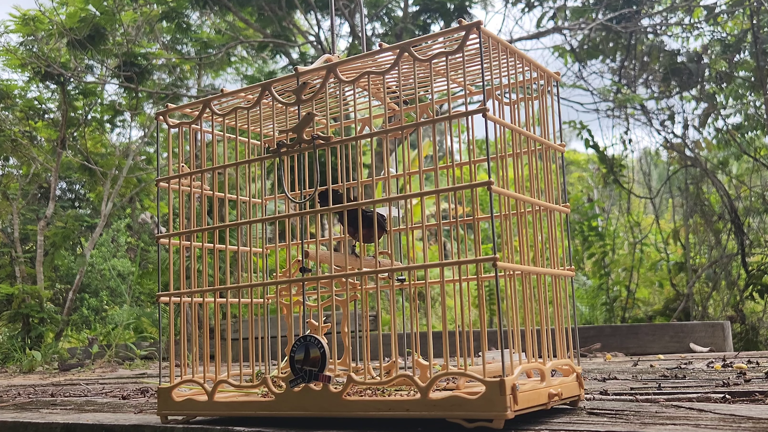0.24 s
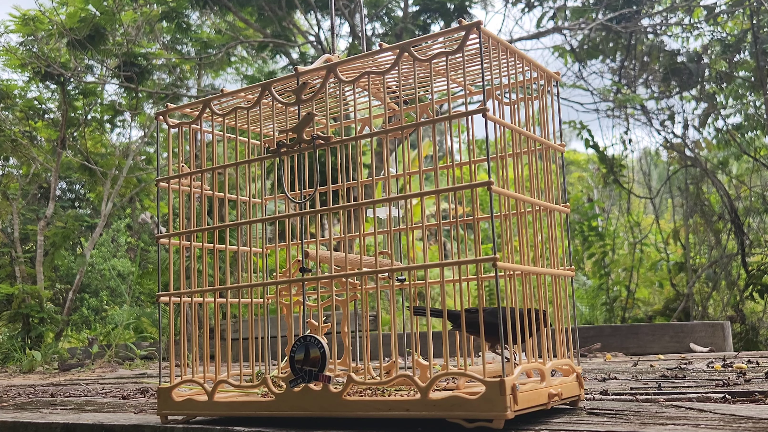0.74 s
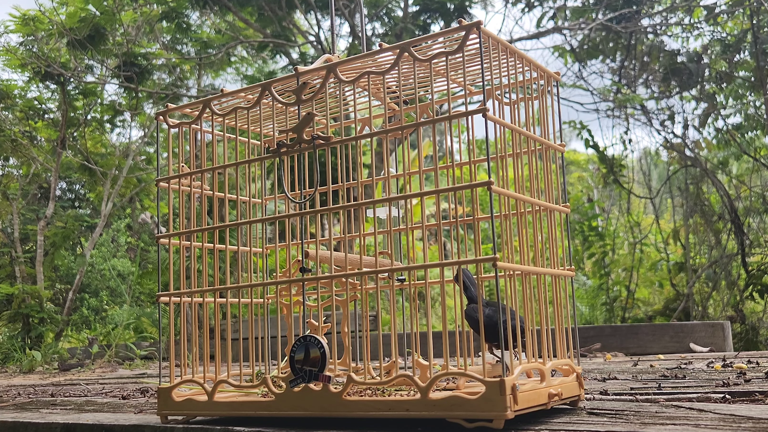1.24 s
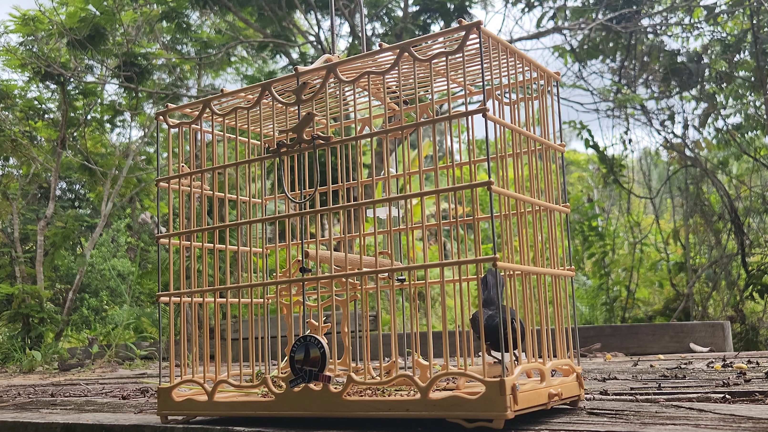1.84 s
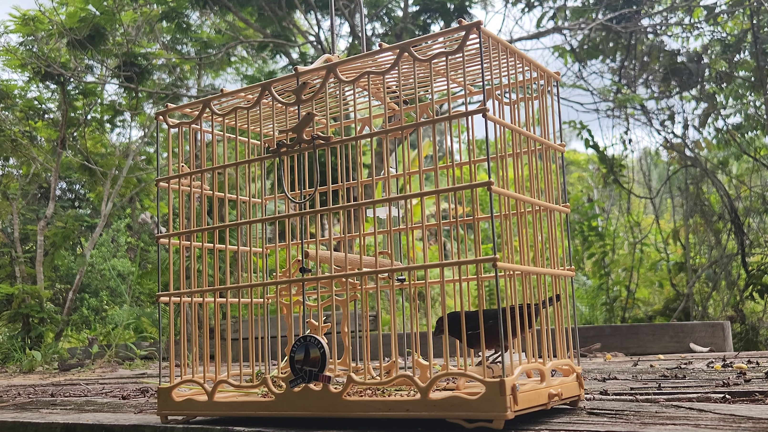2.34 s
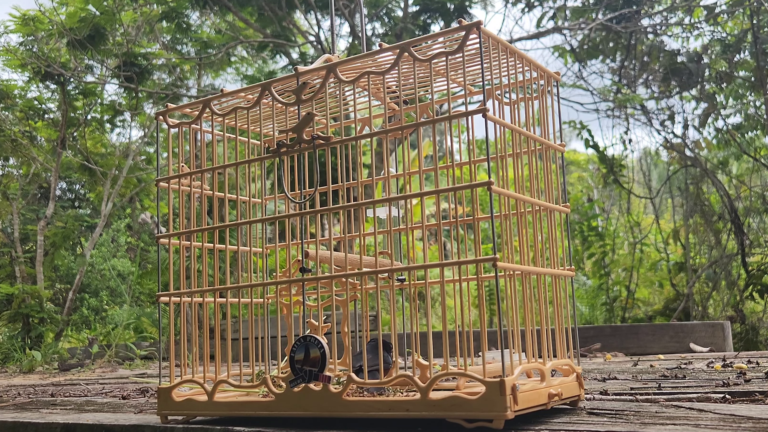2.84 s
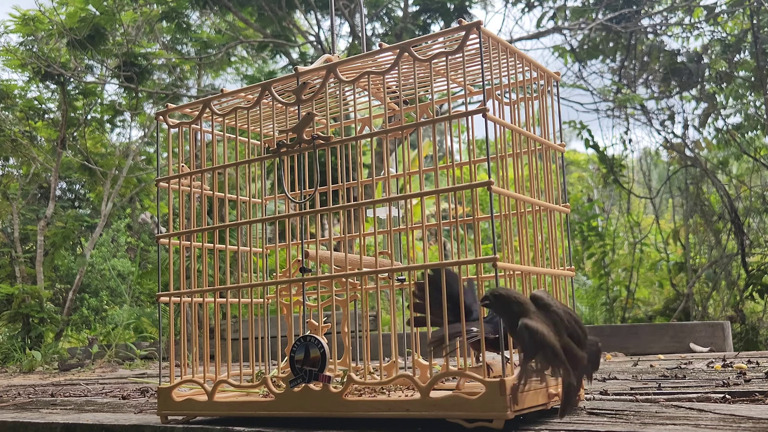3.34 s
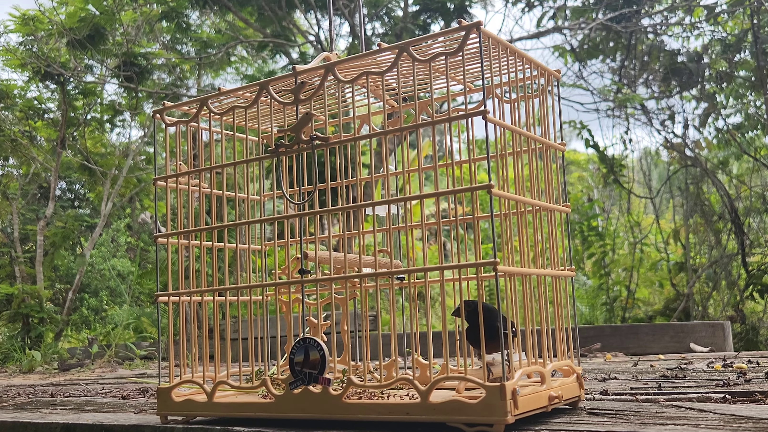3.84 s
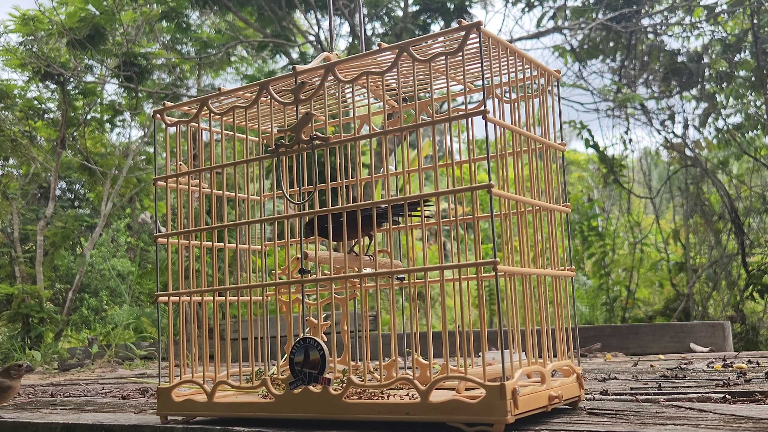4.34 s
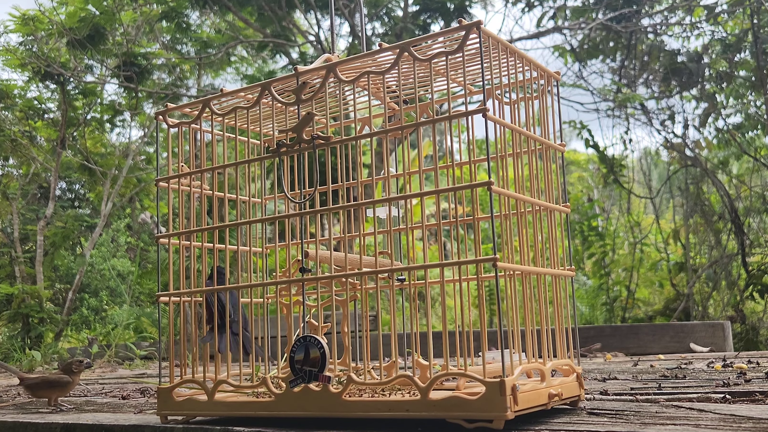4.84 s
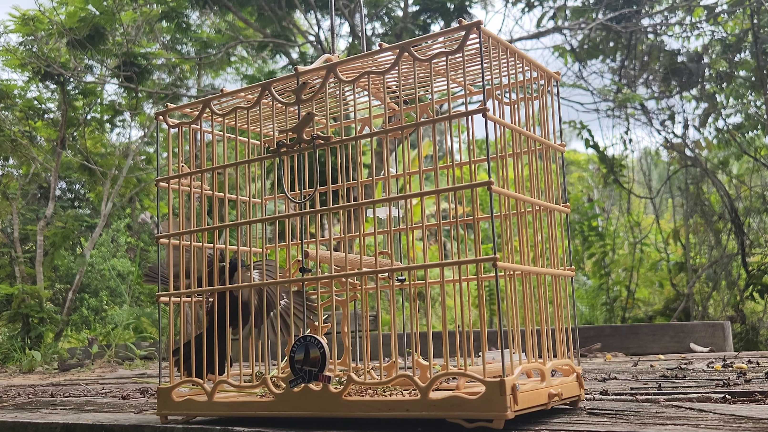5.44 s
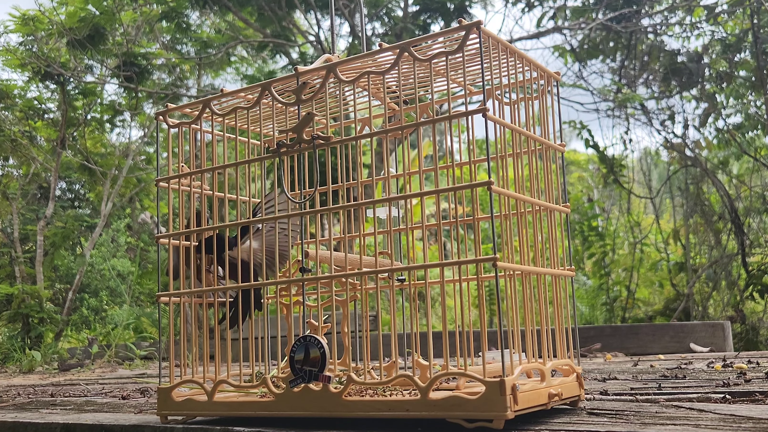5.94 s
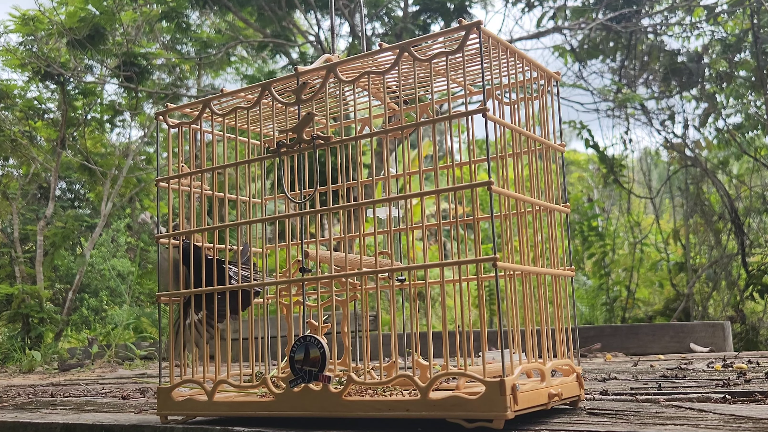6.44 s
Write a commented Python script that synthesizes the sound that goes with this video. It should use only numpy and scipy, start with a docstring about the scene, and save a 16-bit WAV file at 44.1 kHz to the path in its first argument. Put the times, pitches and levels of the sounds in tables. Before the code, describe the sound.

Quiet woodland with insects and distant peeps, then wings whoosh close past, claws tick on cage bars, and slurred whistles lead into a buzzy trill.

```python
"""Far whistles and faint peeps come from the trees over insects, while a finch stirs in a small barred cage
on a wooden deck at the edge of a wood. A second finch then flies close past the microphone and lands.
Slurred whistles, a buzz and a trill follow, as feathers brush and flutter on the bars and claws tick on them.
Birds sing as gliding tones; wings are pulses of air with swishing noise; feathers are grainy noise bursts;
claws are noise snaps with ringing modes; insects are narrow bands of noise in soft outdoor air."""
import sys
import numpy as np
from scipy import signal
from scipy.fft import rfft, irfft
from scipy.io import wavfile
from scipy.ndimage import uniform_filter1d

SR = 44100
rng = np.random.default_rng(int(sys.argv[2]) if len(sys.argv) > 2 else 0)


def generate_wav(sig):
    """Save sig (samples, or channels by samples) to the path in sys.argv[1] as 16-bit PCM at SR."""
    pcm = np.round(np.clip(np.atleast_2d(sig).T, -1, 1) * 32767).astype(np.int16)
    wavfile.write(sys.argv[1], SR, pcm)


N = 295470
TIME, FREQS = np.arange(N) / SR, np.fft.rfftfreq(N, 1 / SR)

# claws catching the bars: start_s, peak_db, knock_db (low ring, relative), scuff_db (sliding foot)
CLAW_CATCHES = [(2.072, -53.5, -3, -64), (3.097, -51, -30, -81), (3.127, -48, -30, -85),
                (3.39, -36, 1, -53.5), (3.776, -39, -6, -57.5), (4.542, -35, -16, -70),
                (4.633, -38, -30, -61.5), (4.844, -46, 6, -67), (5.479, -42, -14, -70),
                (5.505, -46, -27, -51.5), (5.993, -45.5, -15, -66), (6.028, -46.5, -38, -60),
                (6.194, -38, -8, -49.5), (6.36, -37, -2.5, -57), (6.465, -37, -5, -55),
                (6.574, -38.5, 1, -52.5), (6.644, -48.5, 3, -54)]
# bright colour of feathers and claws on the bars: frequency_hz, gain_db
BRIGHT_COLOUR = [(600, -22), (2000, -14), (4000, -8), (5500, 3), (8000, -1), (12000, -2.5), (16000, -7)]
# how alike left and right are for sounds near the microphones: frequency_hz, likeness (0-1)
NEAR_LIKENESS = [(40, 0.91), (500, 0.8), (1200, 0.57), (2500, 0), (16000, 0)]


def amp(db):
    """Decibels to gain."""
    return 10 ** (np.asarray(db) / 20)


def unit(x):
    """Scales to rms 1."""
    return x / np.sqrt(np.mean(x ** 2) + 1e-20)


def read(points):
    """A spectrum joined by straight lines over log frequency."""
    hz, value = np.transpose(points)
    return np.interp(np.log(FREQS + 1), np.log(hz), value)


def add(mix, start_s, sound):
    """Mixes a sound in at its start time, cut off at the end of the scene."""
    part = mix[..., max(round(start_s * SR), 0):][..., :sound.shape[-1]]
    part += sound[..., :part.shape[-1]]


def placed(pan_db):
    """Left and right gains for a level difference; positive is louder on the left."""
    return amp([[pan_db / 2], [-pan_db / 2]])


def drift(rate_hz):
    """Random motion of rms 1, smoothed by a Gaussian low-pass."""
    return unit(irfft(rfft(rng.standard_normal(N)) * np.exp(-(FREQS / rate_hz) ** 2), N))


def noise(gain, likeness, grain_db=0):
    """Coloured stereo noise of rms 1; grain_db breaks it into tiny crackles."""
    grains = amp(grain_db * np.clip(drift(1970), -2.5, 2.5))
    left, other = rfft(rng.standard_normal((2, N)) * grains)
    same = np.clip(read(likeness), -1, 1)
    right = same * left + np.sqrt(1 - same ** 2) * other
    return unit(irfft(np.array([left, right]) * gain, N))


def echoes(x, t60, delay):
    """Sparse scattered reflections, different on each side; t60 and delay in seconds."""
    t = np.arange(SR) / SR
    sparse = rng.standard_normal((2, SR)) * (rng.random((2, SR)) < .05)
    taps = sparse * amp(-60 * t / t60) * (t > delay)
    return signal.fftconvolve(np.atleast_2d(x), unit(taps) / np.sqrt(SR), axes=1)[:, :N]


def wingbeats(count=2):
    """Every beat as (s, push dB, swish dB): each burst swells to its strongest beat and dies away."""
    # bursts of wingbeats, in flight or fluttering on the bars:
    # strongest_beat_s, spread_s, push_db (air), swish_db (feathers)
    bursts = [(2.995, 0.035, -41, -59), (3.229, 0.031, -40.5, -56), (3.412, 0.048, -37, -39),
              (3.51, 0.034, -29.5, -38.5), (3.712, 0.071, -29.5, -35.5), (3.94, 0.029, -46.5, -43.5),
              (4.618, 0.031, -52, -69), (5.618, 0.1, -47, -49)]
    beat_gap_s, jitter_s = 0.03135, .0008
    push_fall_db, swish_fall_db = 6.5, 20  # drop one spread away from the strongest beat
    tiring_db = 2.5  # later beats are weaker
    beats = []
    for s, spread, push_db, swish_db in bursts:
        for offset in np.arange(-count, count + 1) * beat_gap_s:
            u = offset / spread
            beat_s = s + offset + jitter_s * rng.standard_normal()
            beat_push_db = push_db - push_fall_db * u ** 2 - tiring_db * u
            beat_swish_db = swish_db - swish_fall_db * u ** 2 - tiring_db * u
            beats.append((beat_s, beat_push_db, beat_swish_db))
    return beats


def wings(gust_db=-2, rebound=0.97, lead_s=0.0041, swish_s=0.0053, wake_db=-19, wake_s=0.033):
    """Each beat sucks the air in and throws it back; the feathers swish just before the deepest suction."""
    # colour of the swishing feathers: frequency_hz, gain_db
    swish_colour = [(25, 10), (130, 10), (300, -0.5), (750, 0), (1400, -7), (2800, -15.5), (7000, -19),
                    (16000, -25.5)]
    quiver_hz, quiver_db, quiver_s = 84.6, -7, 0.013  # the air quivers around each stroke
    push, power = np.zeros(N), np.zeros(N)
    t = np.arange(-.07, .07, 1 / SR)
    for s, push_db, swish_db in wingbeats():
        u = t / (0.0076 * rng.uniform(0.95, 1.2))  # half a stroke, in seconds, varies from beat to beat
        gust = (2 * u ** 2 - 1 + rebound * (u ** 3 - u)) * np.exp(-u ** 2)
        quiver = np.sin(2 * np.pi * (quiver_hz * t + rng.random())) * np.exp(-(t / quiver_s) ** 2)
        add(push, s + t[0], amp(push_db) * (amp(gust_db) * gust + amp(quiver_db) * quiver))
        wake = amp(wake_db) * np.exp(-(t / wake_s) ** 2)
        stroke = np.exp(-((t + lead_s) / swish_s) ** 2) + wake
        add(power, s + t[0], (amp(swish_db) * stroke) ** 2)
    swish = np.sqrt(power) * noise(amp(read(swish_colour)), NEAR_LIKENESS, grain_db=5.5)
    return push * placed(0.99) + swish


def flutter(count=7, gap_s=.05, slowing_s=.002):
    """Seconds from the start of the flutter to each blow on the bars; the gaps slowly widen."""
    k = np.arange(count)
    return k * gap_s + k * (k - 1) / 2 * slowing_s


def strokes():
    """Every touch on the cage as (s, body dB, hiss dB, fade): sweeps, scuffing feet and fluttering wings."""
    # single sweeps of feathers over the cage: start_s, body_db, hiss_db, fade (relative length)
    sweeps = [(.083, -64, -70, 0.013), (.608, -55.5, -61, 0.012), (1.39, -72.5, -65, 0.024),
              (2.471, -56, -65, .009), (2.609, -68, -41, 0.027), (2.972, -57, -55, 0.02),
              (3.055, -85, -59, .05), (3.094, -86, -48.5, 0.037), (3.226, -66, -53.5, .12),
              (3.323, -47.5, -50.5, 0.021), (3.407, -51.5, -52, 0.021), (3.637, -63.5, -63, 0.14),
              (4.539, -52.5, -50, 0.037), (4.618, -71, -57, 0.054), (4.816, -56.5, -49.5, 0.038),
              (4.928, -66, -58.5, 0.038), (5.479, -50.5, -45, 0.017), (5.994, -61, -52.5, 0.01),
              (6.518, -59.5, -64, 0.084)]
    # the foot slides 0.013 s before the claw catches
    scuffs = [(s - 0.013, db, db - 6, 0.016) for s, _, _, db in CLAW_CATCHES]
    blows = []
    for t in flutter():
        fall_db = 24 * t  # the flutter weakens by 24 dB a second
        blows.append((5.495 + t, -46 - fall_db, -49.5 - fall_db, 0.019))
    return [*sweeps, *scuffs, *blows]


def brushes(rise_share=0.2, tail_db=-27, tail_s=0.1, fizz_db=-13, lightness=0.077):
    """Feathers scrape over the bars in grainy bursts, dull body and bright hiss; light strokes fizz on top."""
    # dull colour of feathers on the cage: frequency_hz, gain_db
    body_colour = [(30, -5), (150, -13.5), (400, 1.5), (900, -2.5), (1600, -0.5), (2600, -1.5), (4500, -5),
                   (9000, -35)]
    # colour of the fizz: frequency_hz, gain_db
    fizz_colour = [(5000, -32), (8000, 7), (11000, 13), (16000, -15)]
    body, hiss, fizz = np.zeros(N), np.zeros(N), np.zeros(N)  # powers, so that strokes overlap as noise does
    t = np.arange(SR // 2) / SR
    for s, body_db, hiss_db, fade in strokes():
        rise = rise_share * fade
        fall = np.exp(-(t / (1.48 * fade)) ** 2) + amp(tail_db) * np.exp(-t / tail_s)
        shape = np.minimum(t / rise, 1) * fall
        stroke_fizz_db = hiss_db + fizz_db + lightness * (hiss_db - body_db)
        add(body, s - rise / 3, (amp(body_db) * shape) ** 2)
        add(hiss, s - rise / 3, (amp(hiss_db) * shape) ** 2)
        add(fizz, s - rise / 3, (amp(stroke_fizz_db) * shape) ** 2)
    dull = np.sqrt(body) * noise(amp(read(body_colour)), NEAR_LIKENESS, grain_db=3.0)
    bright = np.sqrt(hiss) * noise(amp(read(BRIGHT_COLOUR)), NEAR_LIKENESS, grain_db=5.0)
    fizzing = np.sqrt(fizz) * noise(amp(read(fizz_colour)), NEAR_LIKENESS, grain_db=9.0)
    return dull + (bright + fizzing) * placed(-1.1)


def ticks(snap_s=0.0022, snap_db=2, knock_db=-3, pan_db=0.5):
    """A claw snaps against a bar and the light frame rings briefly."""
    # colour of the snap: frequency_hz, gain_db
    snap_colour = [(300, -12), (2500, -5), (4500, 1), (8000, 0.5), (12000, 2), (16000, -6)]
    # ringing modes of the cage: centre_hz (each catch detunes it), level_db (relative), t60_s
    cage_modes = [(604, -14.5, 0.045), (925, 2, 0.013), (1376, 8.5, 0.008), (1810, -18, 0.0076),
                  (2260, -3, 0.021), (3350, -32, .012)]
    out, t = np.zeros((2, N)), np.arange(3000) / SR
    snap = noise(amp(read(snap_colour)), NEAR_LIKENESS)
    for s, db, low_db, _ in CLAW_CATCHES:
        ring = np.zeros(len(t))
        for hz, mode_db, t60 in cage_modes:
            ring += amp(mode_db - 60 * t / t60) * np.sin(2 * np.pi * hz * rng.uniform(0.91, 1.11) * t)
        crack = snap[:, rng.integers(N - len(t)):][:, :len(t)] * np.exp(-t / snap_s)
        catch = amp(snap_db) * crack + amp(knock_db + low_db) * ring / 2
        add(out, s, amp(db) * placed(pan_db) * catch)
    return out + amp(-20) * echoes(out, t60=0.014, delay=.002)


def scratches(per_s=12, size_db=-72):
    """Tiny claw scratches as the bird shifts its grip, stronger once it grows restless."""
    loudness_db = size_db + 2.5 * np.minimum(rng.exponential(1, N), 3)
    sizes = amp(loudness_db) * (rng.random(N) < per_s / SR)
    shape = signal.lfilter([1], [1, -np.exp(-1 / (0.036 * SR))], sizes)  # each dies away over 0.036 s
    restless_db = np.interp(TIME, [2.4, 5.4, 5.6], [-9, 0, 6])
    return shape * noise(amp(read(BRIGHT_COLOUR)), NEAR_LIKENESS, grain_db=6) * amp(restless_db)


def thumps(rise_s=0.014, fade_s=0.03):
    """Dull, unpitched shudders of the cage on the deck, one under each stroke."""
    # colour of the shudder: frequency_hz, gain_db
    thump_colour = [(25, 6.5), (60, 10.5), (110, 7), (220, 0.5), (400, -6), (900, -55), (3000, -53)]
    shape, t = np.zeros(N), np.arange(SR // 4) / SR
    for s, db, _, _ in strokes():
        # 3.5 dB under the body of the stroke that shakes the cage
        add(shape, s, amp(db - 3.5) * np.minimum(t / rise_s, 1) * np.exp(-t / fade_s))
    return shape * noise(amp(read(thump_colour)), NEAR_LIKENESS)


def tone(hz, db, overtone_db=-33):
    """A bird's nearly pure tone with soft ends."""
    phase = 2 * np.pi * np.cumsum(hz) / SR
    overtones = np.sin(2 * phase) + np.sin(3 * phase)
    wave = np.sin(phase) + amp(overtone_db) * overtones
    return np.sqrt(2) * amp(db) * wave * signal.windows.tukey(len(hz), .12)


def glide(rows):
    """Time, smoothed pitch and level along a run of (s, Hz, dB) points."""
    s, hz, db = np.transpose(rows)
    t = np.arange(s[0], s[-1], 1 / SR)
    return t, uniform_filter1d(np.interp(t, s, hz), 500), np.interp(t, s, db)


def whistle(start, length, first_hz, last_hz, arch_hz, level_db, crest):
    """Time, pitch and level of a note that slides onto its last pitch, arches and swells."""
    t = np.arange(0, length, 1 / SR)
    u, crest = t / length, np.clip(crest, .1, .9)
    settle_s = .075
    slide = np.expm1(-t / settle_s) / np.expm1(-length / settle_s)
    hz = first_hz + (last_hz - first_hz) * slide + arch_hz * np.sin(np.pi * u) ** 2
    ends_db = -6.5 * np.interp(u, [0, crest, 1], [-1, 0, 1]) ** 2
    onset_db = -8 * np.maximum(1 - u / crest, 0) ** 3  # the start is softer still than the end
    return start + t, hz, level_db + ends_db + onset_db


def whistles(wobble, waver=0.0054, blur=0.0179):
    """Near and far parts of the slurred notes; those from deeper in the trees waver more."""
    # whistled notes: start_s, length_s, first_hz, last_hz, arch_hz, level_db (before distance),
    # crest (loudest point, 0-1), depth (into the trees, 0-1)
    whistle_notes = [ (0.056, 0.13, 3630, 3130, 83, -73.5, 0.6, 0.66),
                     (2.003, 0.14, 3790, 3300, 99, -66, 0.26, 0.65),
                     (2.409, 0.11, 3565, 3036, 0, -64, 0.8, 0.97),
                     (2.505, .3, 3150, 2860, 478.5, -67, 0.6, 1),
                     (3.99, 0.059, 3000, 2810, 0, -66.5, .7, .01),
                     (4.05, 0.084, 2884, 3220, 39, -53.5, 0.3, 0.04),
                     (4.22, 0.083, 4630, 2930, 378, -53.5, 1, 0.28),
                     (4.348, .064, 4510, 2983, 168, -53.5, 0.96, 0.19),
                     (4.46, 0.38, 3103, 2870, 870.5, -54.5, 0.93, 0.03),
                     (4.955, 0.033, 4170, 6100, -200, -53, 0.54, 0.01),
                     (5.045, 0.043, 5900, 4240, -4, -59, 0.4, 0),
                     (5.093, .155, 4230, 3415, 208, -51, 0.9, 0.01),
                     (5.327, 0.027, 4000, 6370, -450, -51.5, .5, 0.15),
                     (5.385, 0.22, 5960, 3568, 59, -46.5, 0.31, 0.03)]
    near, far = np.zeros(N), np.zeros(N)
    for *shape, depth in whistle_notes:
        t, hz, db = whistle(*shape)
        depth = np.clip(depth, 0, 1)
        unsteady = waver + blur * depth * (hz / 3000) ** 2
        note = tone(hz * (1 + unsteady * np.interp(t, TIME, wobble)), db)
        add(near, t[0], (1 - depth) ** 2 * note)
        add(far, t[0], np.sqrt(depth) * note)
    return near, far


def buzz(flicks_per_s=87, flick_depth=0.18):
    """Start time and sound of a run of fast upward flicks in pitch."""
    # path of the buzz: time_s, pitch_hz (flicked around), level_db (before the flicks)
    buzz_path = [(5.695, 5000, -64), (5.72, 5290, -50), (5.84, 5184, -49.5), (5.885, 4800, -50),
                 (5.92, 4430, -55), (5.97, 4500, -62)]
    t, hz, db = glide(buzz_path)
    flick = ((t - t[0]) * flicks_per_s + 0.042 * np.interp(t, TIME, drift(40))) % 1
    sweep = 1 + flick_depth * (.6 - 3.1 * (1 - flick) ** 2.6)  # each flick shoots up and levels off
    swell = np.sin(np.pi * flick ** 1.06)
    return t[0], tone(hz * sweep, db - 0.5) * swell


def trill(wobble, arch_s=0.033, quaver=0.043, rasp_db=3, undertone_db=-12, flank_db=-3):
    """Rough arched notes in quick runs, each with an undertone an octave below its crest."""
    # runs of arched notes that close the song: start_s, length_s, level_db, top_hz (of the first note)
    trill_runs = [(6.002, .43, -54, 5268), (6.488, .03, -53, 5050), (6.614, .085, -53.5, 5170)]
    gap_s, sag_hz_per_s, drop = .0573, 900, .28
    out, shake = np.zeros(N), drift(490)
    u = np.arange(-arch_s, arch_s, 1 / SR) / arch_s
    for run_s, length, level_db, first_top_hz in trill_runs:
        for t in np.arange(0, length, gap_s):
            s, top_hz = run_s + t, first_top_hz - sag_hz_per_s * t
            arch = 1 - drop * np.sin(np.pi * u / 2) ** 2
            hz = top_hz * arch * (1 + quaver * np.interp(s + u * arch_s, TIME, shake))
            rough_db = rasp_db * np.interp(s + u * arch_s, TIME, wobble)  # the voice is uneven
            db = level_db + flank_db * u ** 2 + rough_db
            undertone = tone(hz / 2, db + undertone_db - 110 * u ** 2)
            add(out, s - arch_s, tone(hz, db) + undertone)
    return out


def song(lag_s=0.00018):
    """Whistles, a buzz and a trill; notes from deeper in the trees are mostly echo."""
    wobble = drift(146)
    slurs, far = whistles(wobble)
    add(slurs, *buzz())
    trilled = trill(wobble)
    direct = amp(-1.0) * slurs + amp(-7.0) * trilled
    sides = np.array([np.interp(TIME - lag_s, TIME, direct), direct])  # reaches the right microphone first
    trees = echoes(amp(1.5) * slurs + amp(1) * trilled, t60=0.48, delay=.006)
    deep = echoes(far, t60=.42, delay=.003)
    return sides * placed(-10.0) + trees + deep


def peeps(length_s=0.026, rasp=0.07, count=60, chatter_db=-82, spread_db=7, chatter_hz=1400):
    """Short hoarse far calls among the trees, with mostly fainter chatter at random times."""
    # the clearest peeps: centre_s, level_db (before distance), pitch_hz, glide_octaves
    clear_peeps = [(0.287, -69, 1634, 0.83), (1.454, -73, 1420, 0.29), (1.604, -71.5, 1350, -0.49),
                   (1.576, -70, 1574, 0.14), (1.89, -71.5, 1468, 0), (2.035, -73.5, 1413, 0.31),
                   (2.105, -69, 4570, 0.16), (2.249, -66, 5620, 0.17), (2.615, -60.5, 1420, 0.026),
                   (3.58, -66.5, 1426, 0.58), (4.698, -68.5, 1370, 0.19), (5.192, -67, 1320, -0.73)]
    out, u = np.zeros(N), np.linspace(-.5, .5, int(length_s * SR))
    chatter = []
    for when, loud, high, slope in rng.random((count, 4)):
        pitch_hz = chatter_hz * 2 ** (0.588 * (high - .5))
        chatter.append((when * N / SR, chatter_db + spread_db * loud, pitch_hz, slope - .5))
    shake = drift(300)
    for s, db, hz, octaves in [*clear_peeps, *chatter]:
        bend = 2 ** (octaves * u) * (1 + rasp * np.interp(s + u * length_s, TIME, shake))
        add(out, s - length_s / 2, tone(hz * bend, db - 40 * u ** 2))
    return amp(3.5) * out + amp(2.5) * echoes(out, t60=0.13, delay=0.0027)


def woodland(air_db=-71, swell_db=1):
    """Soft outdoor air and a chorus of insects in narrow bands that falters now and then."""
    # colour of the air: frequency_hz, gain_db
    air_colour = [(15, -27), (25, 7), (114, 1), (166, -0.5), (354, -3), (489, -2), (962, -5), (1070, -5),
                  (1480, -5), (3520, -10), (5140, -11.5), (6380, -22), (16000, -25.5)]
    # bands of insect song: centre_hz, half_width_hz, level_db (before it falters)
    insect_bands = [(6113, 354, -70.5), (7445, 290, -70.5), (8760, 830, -76.5)]
    # how alike left and right are for the open air: frequency_hz, likeness (0-1)
    air_likeness = [(40, 0.43), (300, 0.2), (1000, 0.12), (3000, 0), (16000, 0)]
    air_gain = amp(air_db + swell_db * drift(18.0))
    out = air_gain * noise(amp(read(air_colour)), air_likeness) * placed(2.7)
    falter = np.minimum(drift(0.67) + 0.21, 0)  # shared by all the bands
    for hz, width, db in insect_bands:
        band = noise(np.exp(-.5 * ((FREQS - hz) / width) ** 2), air_likeness)
        out += band * amp(db + 4.0 * falter + .5 * drift(27) + 1.25 * drift(71))
    return out


def scene():
    """The cage in front, the wood behind; the low pushes of air do not carry far enough to echo."""
    near = wings() + brushes() + ticks() + scratches() + thumps()
    radiated = signal.sosfilt(signal.butter(2, 150, "high", fs=SR, output="sos"), near)
    surroundings = amp(-11) * echoes(radiated, t60=0.21, delay=0.012)
    return near + surroundings + song() + peeps() + woodland()


def record(dry):
    """The recorder's band limit: a steep low-pass."""
    edge_hz = 16250
    band_limit = signal.firwin(511, edge_hz, window=("kaiser", 9), fs=SR)
    return signal.oaconvolve(dry, band_limit[None], "same")


dry = scene()
out = record(dry)
generate_wav(out)
```